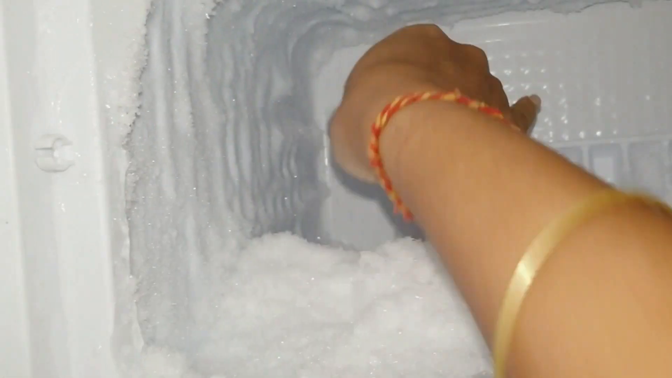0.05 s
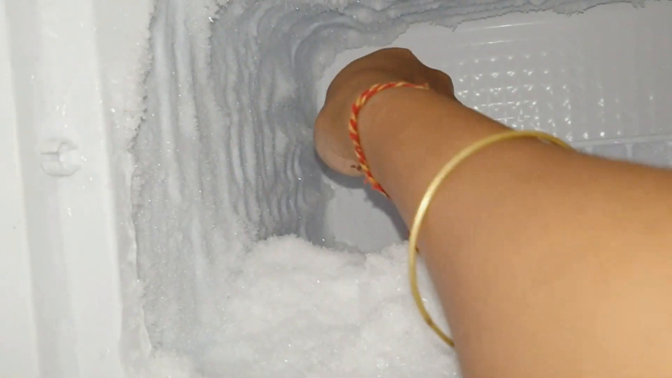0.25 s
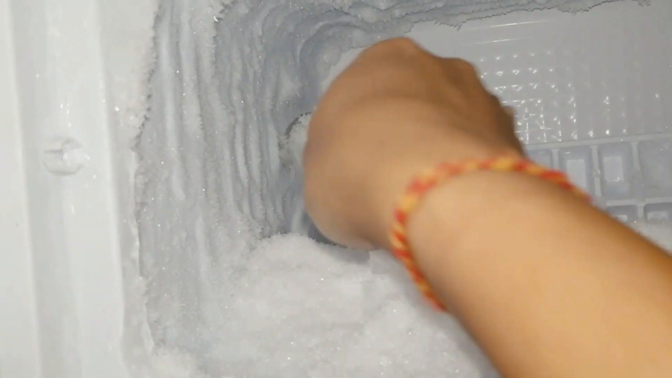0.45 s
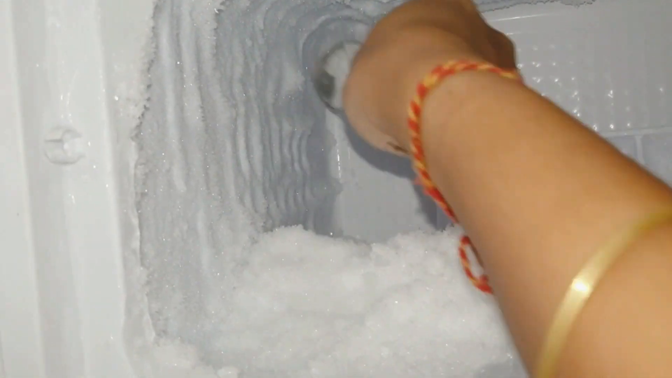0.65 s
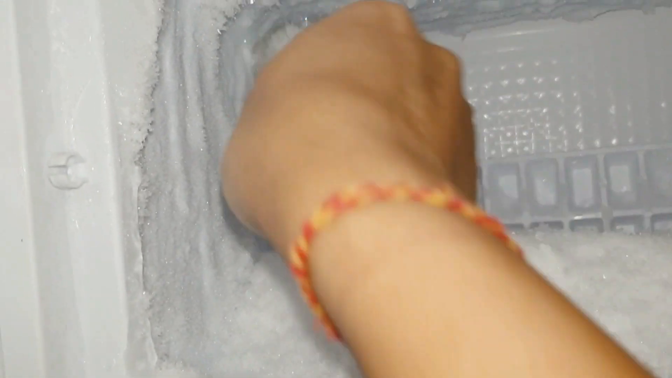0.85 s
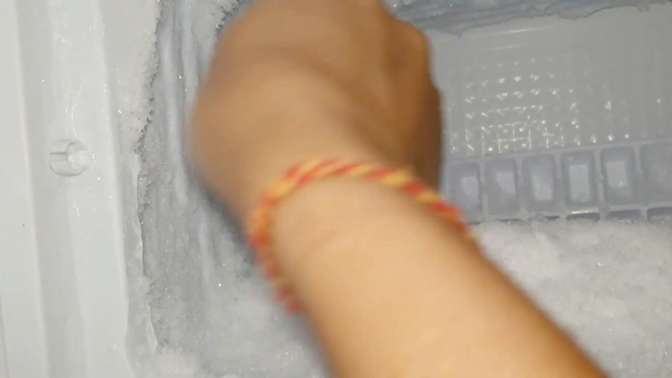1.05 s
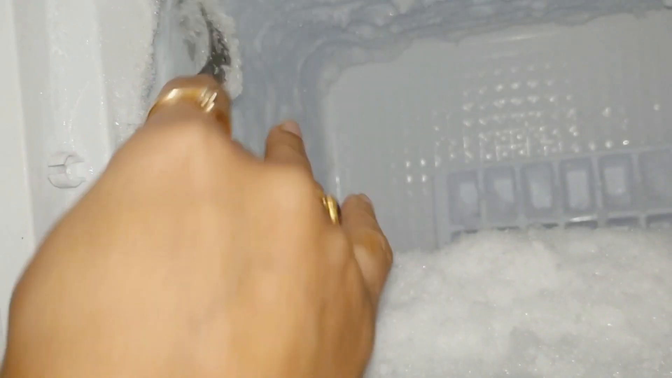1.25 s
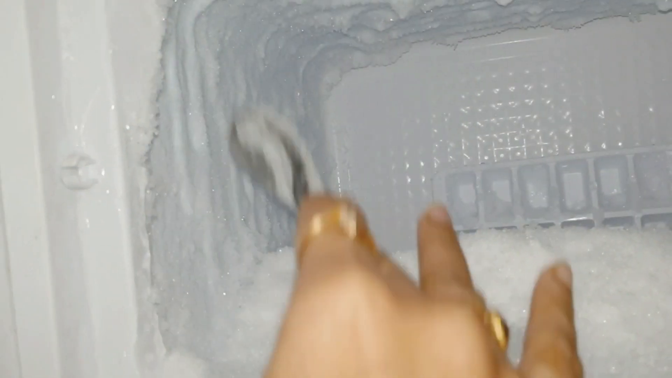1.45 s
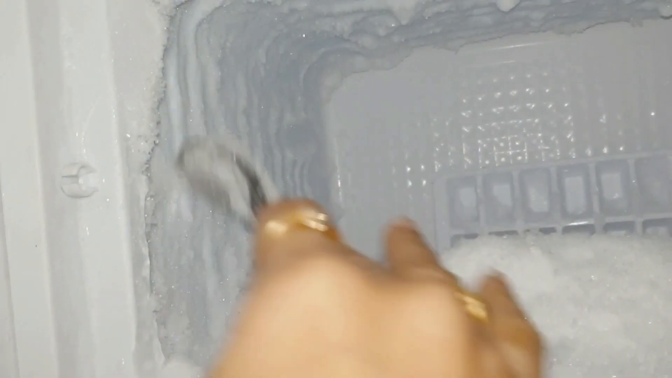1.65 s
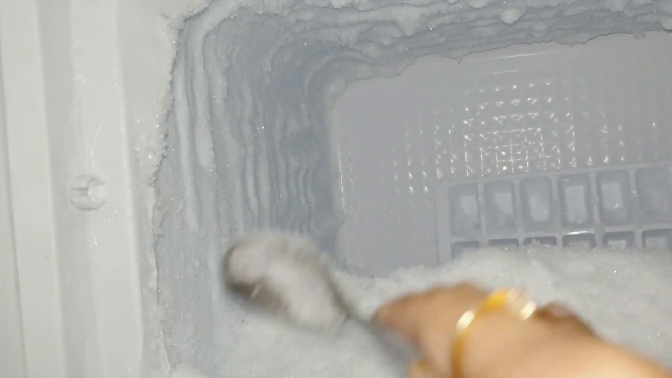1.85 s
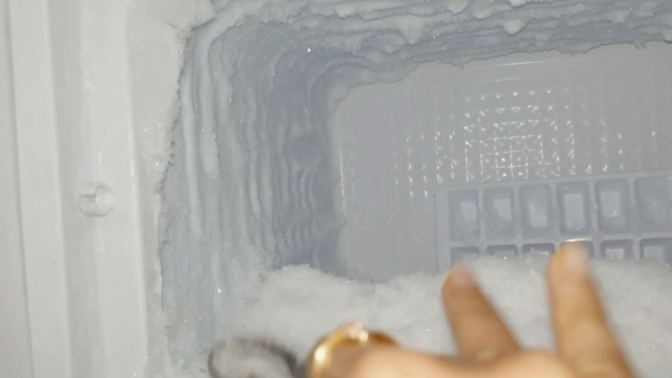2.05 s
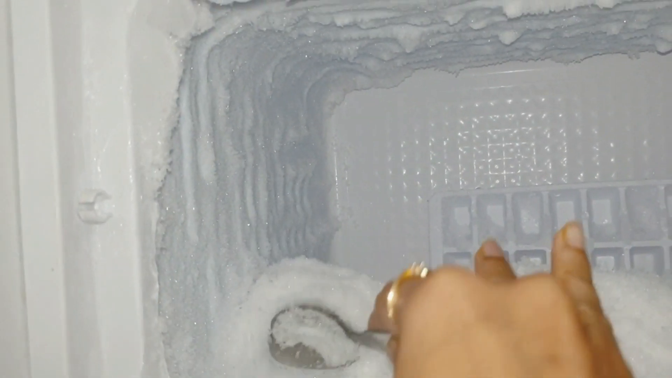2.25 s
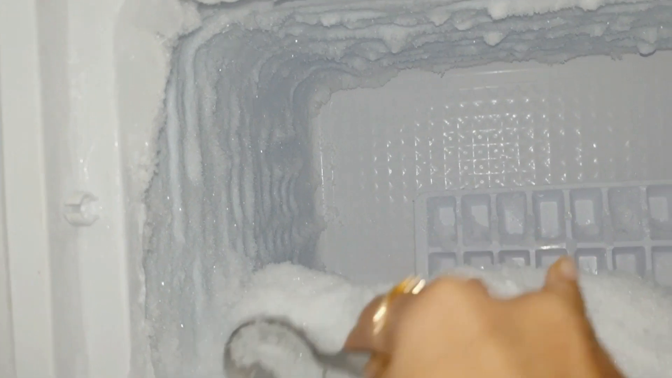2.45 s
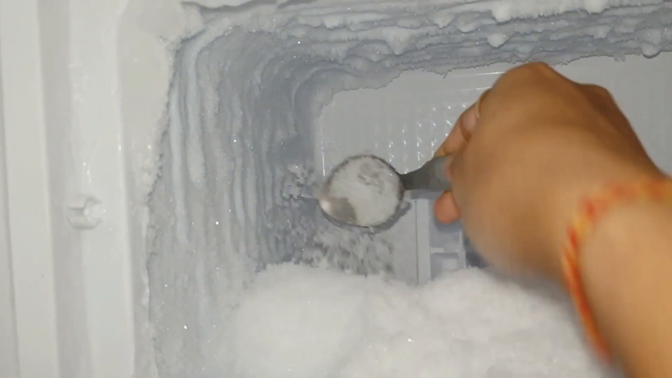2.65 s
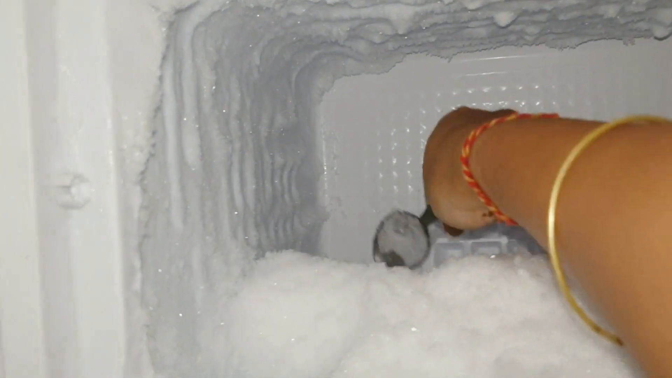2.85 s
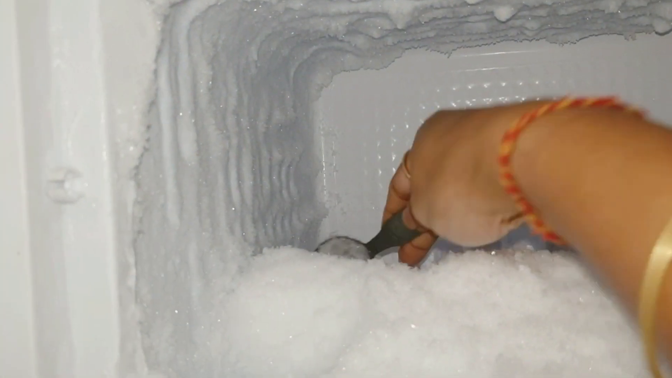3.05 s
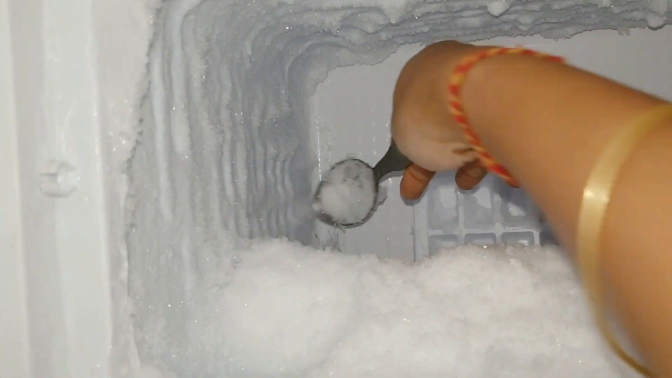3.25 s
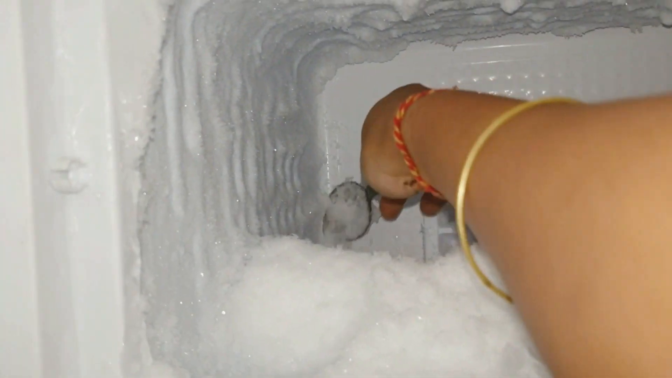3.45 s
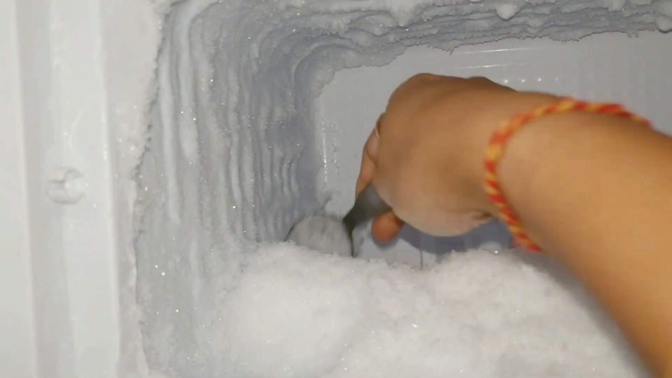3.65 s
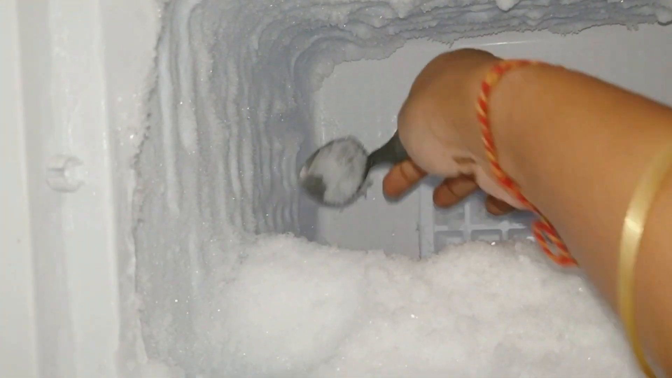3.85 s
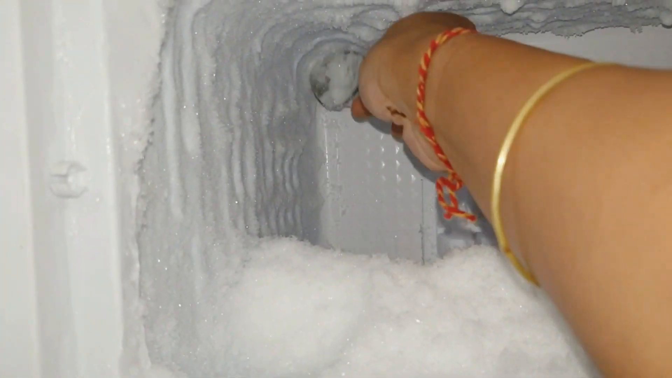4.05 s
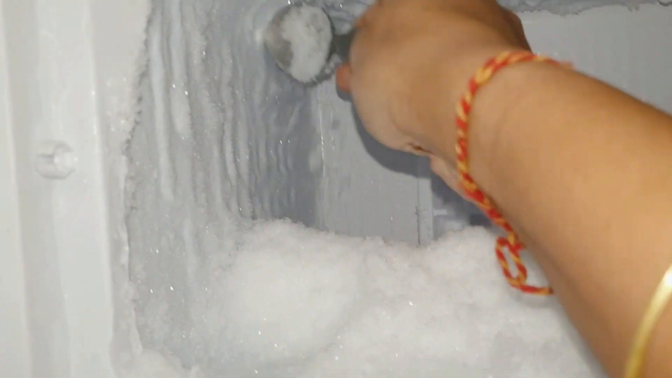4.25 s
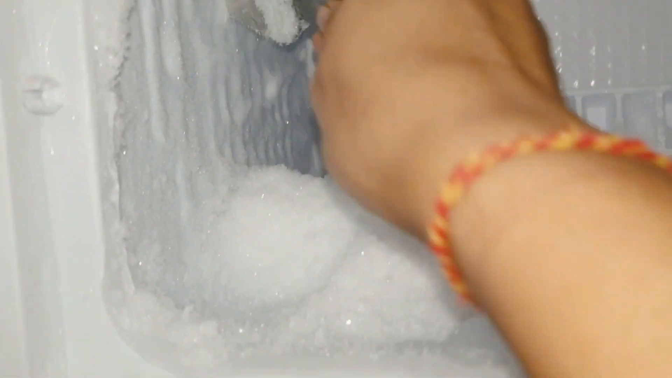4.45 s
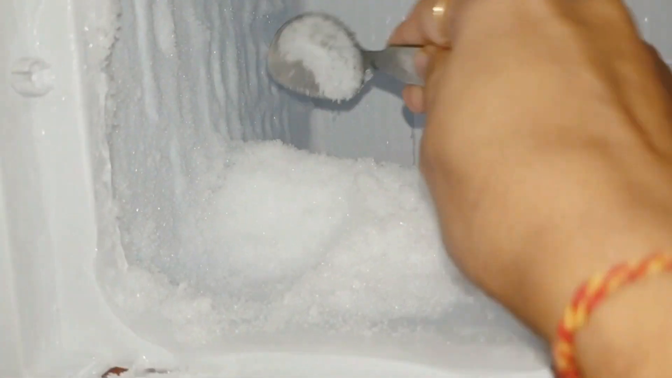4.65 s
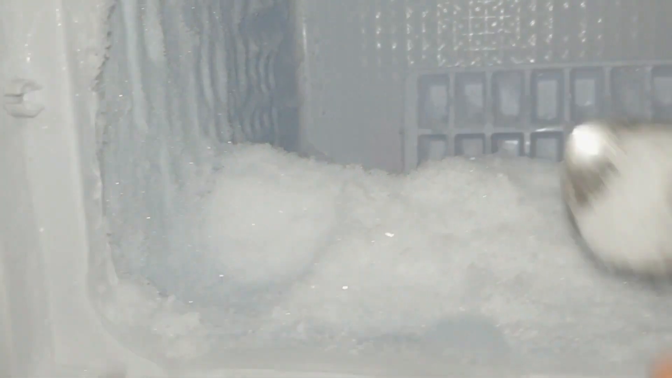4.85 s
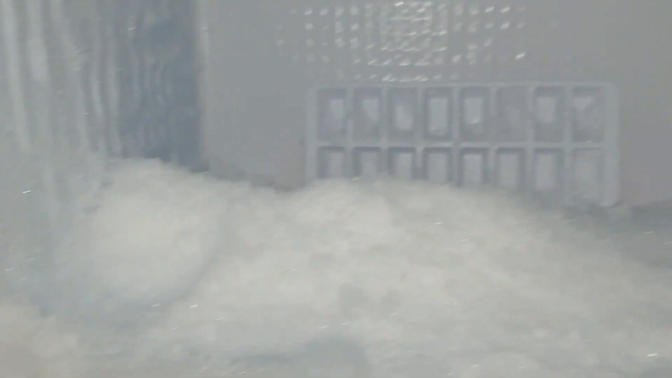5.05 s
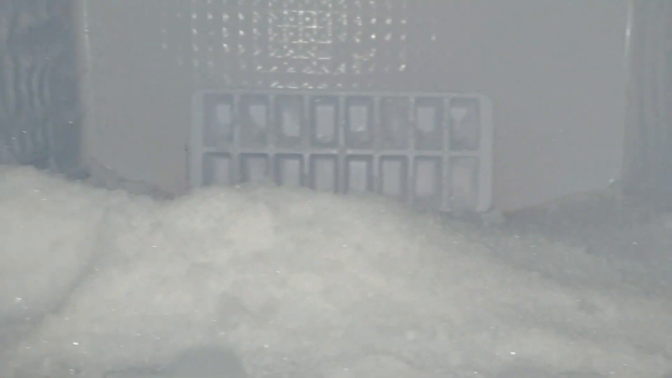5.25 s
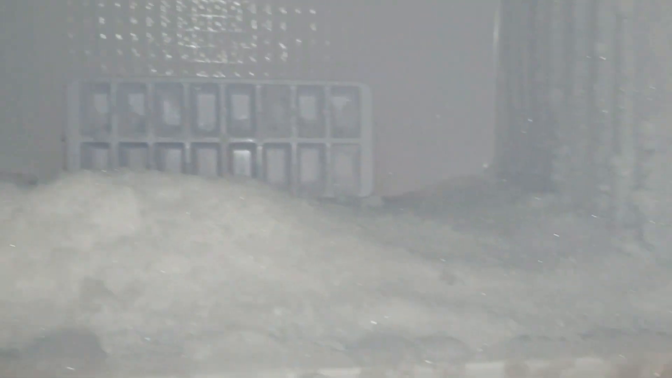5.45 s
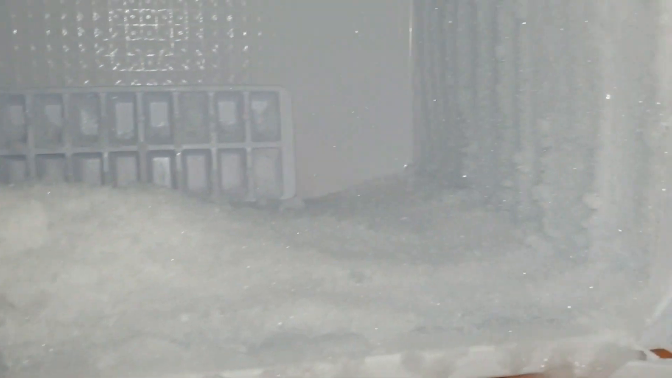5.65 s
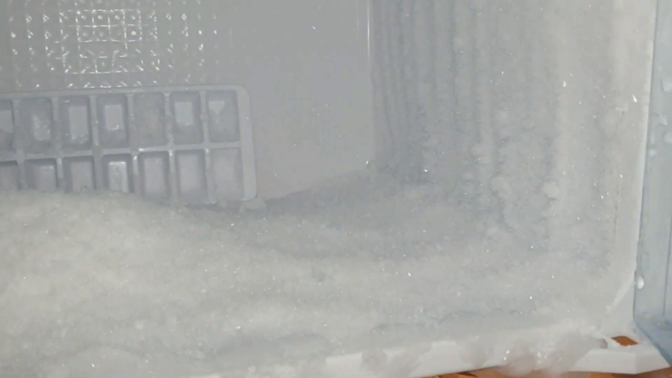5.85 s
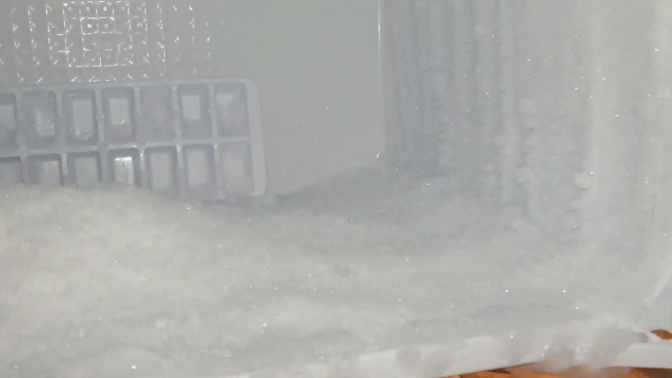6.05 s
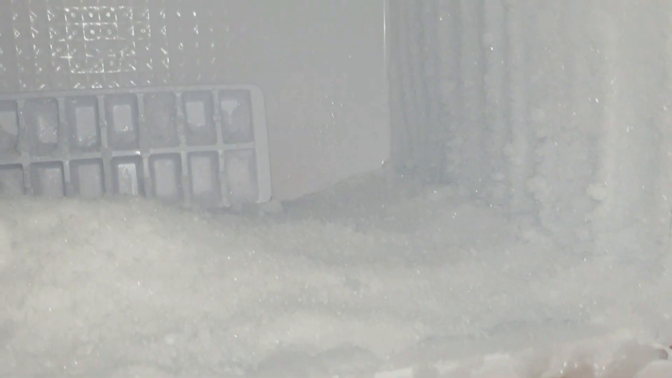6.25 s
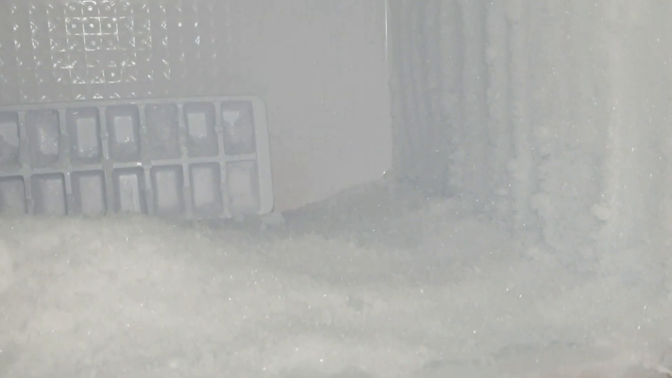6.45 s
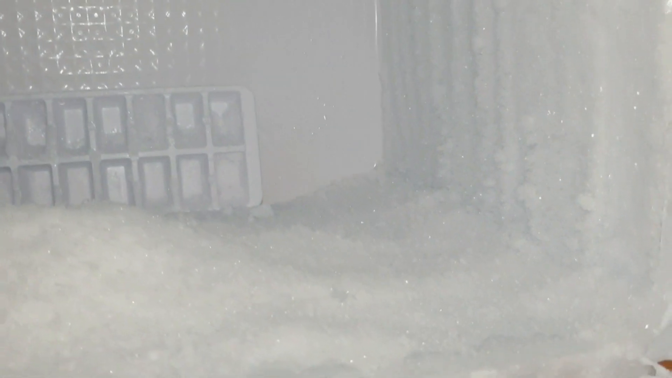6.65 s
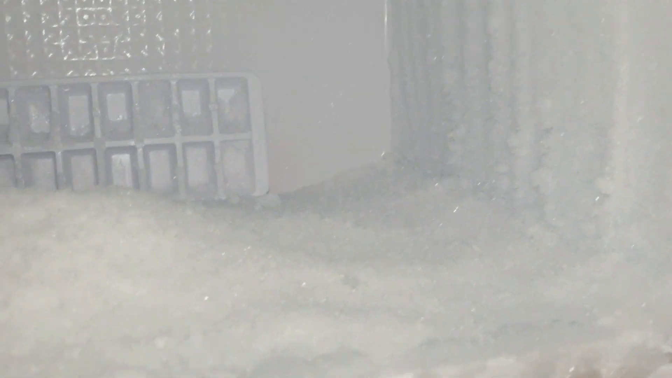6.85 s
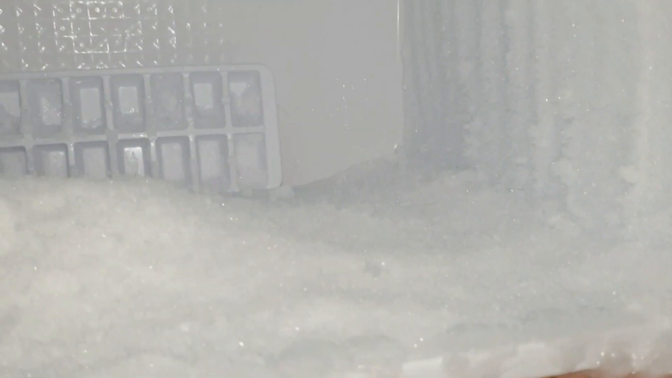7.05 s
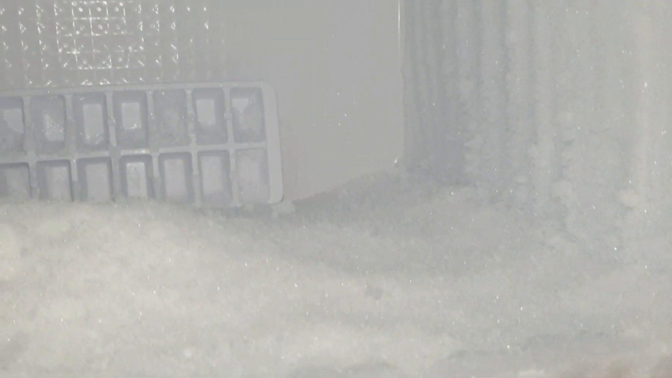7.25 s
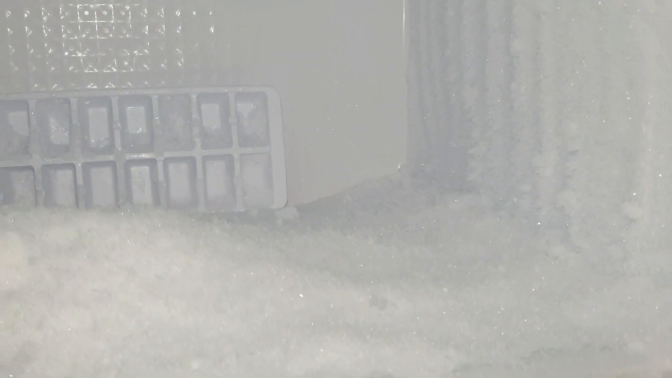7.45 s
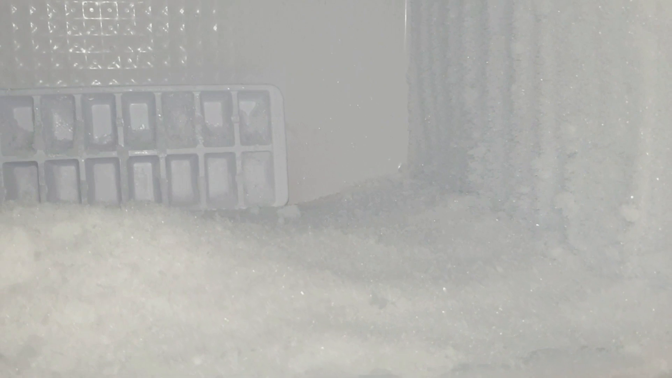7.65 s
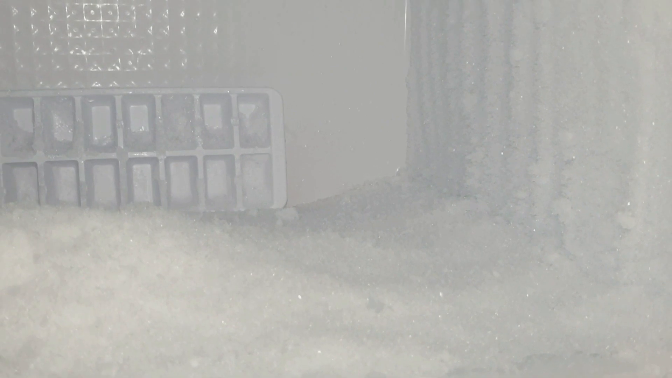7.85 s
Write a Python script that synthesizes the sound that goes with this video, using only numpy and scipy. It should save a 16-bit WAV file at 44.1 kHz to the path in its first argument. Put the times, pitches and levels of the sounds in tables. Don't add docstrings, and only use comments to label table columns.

```python
import sys
import numpy as np
from scipy import signal
from scipy.fft import rfft, irfft
from scipy.io import wavfile

SR = 44100
rng = np.random.default_rng(int(sys.argv[2]) if len(sys.argv) > 2 else 0)


def volts_from_decibels(level):
    exponent = np.asarray(level, float) / 20
    return 10 ** exponent


def waveform_to_disk(signal):
    frames = np.transpose(np.atleast_2d(signal))
    scaled = np.clip(frames, -1, 1) * 32767
    samples = np.round(scaled).astype(np.int16)
    wavfile.write(sys.argv[1], SR, samples)


N = 348831


def rms_one(x):
    return x / np.sqrt(np.mean(x ** 2) + 1e-20)


def noise():
    return rng.standard_normal((2, N))


def in_time(rows):
    s, *columns = np.transpose(rows)
    return [np.interp(np.arange(N) / SR, s, column) for column in columns]


def at_hz(points, hz):
    points = np.array(points)
    return np.interp(np.log(hz), np.log(points[:, 0]), points[:, 1])


def drift(rate_hz):
    r = np.exp(-2 * np.pi * rate_hz / SR)
    white = rng.standard_normal(N + SR)
    return rms_one(signal.lfilter([1], [1, -2 * r, r * r], white)[SR:])


def response(spectrum, peaks):
    hz = np.maximum(np.fft.rfftfreq(8192, 1 / SR), 1)
    level_db = at_hz(spectrum, hz)
    for top_hz, width_hz, gain_db in peaks:
        level_db = level_db + gain_db / (1 + (2 * (hz - top_hz) / width_hz) ** 2)
    cepstrum = irfft(np.log(volts_from_decibels(np.maximum(level_db, -80))))
    cepstrum[1:4096] *= 2
    cepstrum[4097:] = 0
    out = irfft(np.exp(rfft(cepstrum)))[:4096]
    return out / np.sqrt(np.sum(out ** 2))


def coloured(x, spectrum, peaks=()):
    return signal.oaconvolve(x, response(spectrum, peaks)[None], axes=1)[:, :N]


def band(x, low_hz, high_hz):
    sos = signal.butter(3, [low_hz, min(high_hz, .45 * SR)], "band", fs=SR, output="sos")
    return signal.sosfilt(sos, x) * np.sqrt(SR / 2 / (high_hz - low_hz))


def bursts(rows, grains):
    out = np.zeros((2, N))
    for rise, s, fall, peak_db, low_hz, high_hz in rows:
        at = slice(round((s - 2 * rise) * SR), min(round((s + 3 * fall) * SR), N))
        t = np.arange(at.start, at.stop) / SR - s
        bend = 2 if rise == fall else 1.3
        shape = volts_from_decibels(peak_db - 20 * np.where(t < 0, (t / rise) ** 2, np.abs(t / fall) ** bend))
        burst = rms_one(band(grains[:, at] * shape, low_hz, high_hz))
        out[:, at] += burst * np.sqrt(np.mean(shape ** 2))
    return out


def crystals(per_s, spread_db, hiss):
    born = rng.random(N) < per_s * volts_from_decibels(2.2 * drift(40)) / SR
    sizes = born * volts_from_decibels(spread_db * np.minimum(rng.exponential(1, N), 4))
    breaks = rms_one(sizes * rng.choice([-1, 1], (2, N)))
    return rms_one(breaks + hiss * noise())


# start_s, dig_s, pull_s, level_db, pull_loss_db
STROKES = [(0, 0.00069, 0.22, -59, 12.5), (.192, 0.0036, 0.067, -34.5, 1), (0.274, 0.14, .1, -21, 9.5),
           (0.727, 0.068, .11, -30, 3), (1.0, 0.027, 0.029, -48, -3), (1.06, 0.06, .305, -30, 2),
           (1.405, .01, .038, -36.5, 0), (1.621, 0.059, 0.039, -26, -2), (1.994, 0.012, 0.099, -37, 8),
           (2.108, 0.036, .11, -31.5, 3), (2.439, 0.032, 0.047, -34, -1), (2.7, 0.11, 0.11, -58, -10.5),
           (2.94, 0.084, 0.09, -25, 5), (3.498, 0.066, .12, -21.5, 4), (3.873, 0.0092, 0.01, -35, 3.5),
           (3.98, 0.035, 0.17, -29.5, 4), (4.149, 0.037, 0.25, -30, 9), (4.427, 0.0031, 0.13, -27.5, 3),
           (6.8, 0.031, 1.1, -59.5, 8.5), (6.898, 0.0043, 0.033, -34.5, 8.5),
           (7.214, 0.0085, 0.033, -43.5, 4.5), (7.359, 0.036, 0.0045, -28.5, -1)]
# lift_s, bowl_db (re crunch), wall_db (re crunch), panel_db (re wall), fineness_db
GRIP = [(.03, -14, -1.5, -13, -8), (.02, -7.5, -3, -12.5, 1), (0.043, -1.5, -6, -14.5, -2.5),
        (0.06, 0, -5.5, -13.5, -1), (.02, -7.5, 3.5, -5, 0.5), (0.015, 3, -4, 0, 3.5),
        (.015, -4.5, 1, -3, -0.5), (0.039, -4, -3.5, -7.5, -4), (0.021, -8.5, 9.5, 2, -7),
        (.06, 0.5, 7.5, 6, 6.5), (0.034, 4, 10, 5, 5.5), (.04, -2.5, 0.5, -0.5, -5),
        (0.047, -1.5, 0.5, 2.5, 3.5), (0.06, -5, -5.5, -12, -2), (0.019, -8, -6, -8, -2),
        (.04, -5.5, -3.5, -8.5, -3.5), (0.062, -1, -1, -8.5, -2), (0.046, -1.5, -3, -8, -3.5),
        (.1, -3, 7.5, -2, 3.5), (0.064, 3.5, 2, -3.5, 11.5), (0.046, -1, 5, -7, 2.5),
        (0.022, -4.5, -18, -9.5, 1.5)]


def hand():
    entry_db, lift_db, powder_s, powder_db = 13, 21.5, 0.16, 18
    bowl_grows_db, free_share, wall_follows = 4, 0.5, 0.63
    t = np.arange(0, N + 32, 32) / SR
    powers, grip = np.full((3, len(t)), 1e-12), np.zeros((3, len(t)))
    for stroke, hold in zip(STROKES, GRIP):
        s, dig, pull, db, loss_db = stroke
        lift, bowl_db, wall_db, panel_db, fine_db = hold
        times = s + np.cumsum(np.abs([0, dig, pull, lift, powder_s, 2 * powder_s]))
        below = np.cumsum([-entry_db, entry_db, -loss_db, -lift_db, -powder_db, -60])
        shape = np.interp(t, times, below, left=-100)
        bowl = bowl_db + np.interp(t, times[[0, 2, 3]], [-bowl_grows_db, 0, -bowl_grows_db])
        power = volts_from_decibels(2 * (db + shape))
        powers += [power, power * volts_from_decibels(2 * bowl), volts_from_decibels(2 * (db + wall_db + wall_follows * shape))]
        grip += power * np.array([[panel_db], [free_share], [fine_db]])
    rows = (*np.sqrt(powers), *grip / powers[0])
    return [np.interp(np.arange(N) / SR, t, row) for row in rows]


def box(x, t60_s, echo_db, rate_hz):
    fall = volts_from_decibels(-60 * np.arange(2048) / SR / t60_s)
    patterns = rng.standard_normal((3, 2, 2048)) * fall / np.sqrt(np.sum(fall ** 2))
    weights = np.array([drift(rate_hz) for _ in patterns])
    weights /= np.sqrt(np.sum(weights ** 2, axis=0))
    echoes = sum(signal.oaconvolve(x * w, p, axes=1)[:, :N] for w, p in zip(weights, patterns))
    return (x + volts_from_decibels(echo_db) * echoes) / np.sqrt(1 + volts_from_decibels(2 * echo_db))


# pitch_hz, level_db (per Hz)
CRUST = [(530, -19), (900, -4.5), (1070, -1.5), (1340, -2), (1850, -6.5), (3340, -10), (4120, -12),
         (8330, -17), (9000, -26), (11700, -44.5), (19800, -120)]
BOWL = [(7000, -40), (8200, -12), (10000, -5), (12500, -2.5), (15300, -11.5), (16200, -8)]
WALL = [(82, -27), (140, -20.5), (178, -5), (226, -3.5), (291, 4), (567, -1.5), (674, -9.5), (1000, -17.5),
        (1300, -34.5), (2200, -120)]
PANEL = [(100, -34.5), (135, -11), (170, 1.5), (230, -6.5), (280, -5.5), (380, -46)]
# pitch_hz, width_hz, gain_db
CRUST_PEAKS = [(1070, 21, 4), (1820, 320, 2), (3030, 370, 2), (3706, 95, 2.5), (4050, 40, 1),
               (6210, 610, 2), (7600, 150, 4)]
BOWL_PEAKS = [(9290, 560, 6.5), (9960, 110, 3), (11326, 690, 19.5), (12900, 910, 5.5)]
WALL_PEAKS = [(179, 37, 8), (217, 75, 7), (303, 17, 4), (371, 16, 6.5), (460, 14, 5), (563.6, 8.8, 5.5),
              (776, 80, 12.5)]


def scraping(crunch_gain, bowl_gain, wall_gain, panel_db, free, fine_db):
    free = np.clip(free, 0, 1)
    breaks = crystals(3000.0, spread_db=3.0, hiss=0.76)
    chunks = crystals(500.0, spread_db=1.5, hiss=0.64)
    crust, wall, bowl, blows, snaps, ducking = knock_shapes(breaks)
    catch = volts_from_decibels(1.2 * drift(23)) * ducking
    bright = breaks * (catch * bowl_gain + bowl)
    deep = chunks * (catch * wall_gain + wall) + blows

    crunch = coloured(breaks * (catch * crunch_gain + crust), CRUST, CRUST_PEAKS)
    coarse = signal.sosfilt(signal.butter(1, 2600, fs=SR, output="sos"), crunch)
    frost = coarse * volts_from_decibels(-fine_db / 2) + (crunch - coarse) * volts_from_decibels(fine_db / 2)
    ringing = coloured(bright * free, BOWL, BOWL_PEAKS)
    damped = coloured(bright * np.sqrt(1 - free ** 2), BOWL)
    edge = frost + snaps + ringing + damped

    drum = coloured(deep, WALL, WALL_PEAKS) + coloured(deep * volts_from_decibels(panel_db), PANEL)
    near = box(edge, t60_s=.005, echo_db=-5.0, rate_hz=8.9)
    echoed = box(near, t60_s=0.033, echo_db=-1.5, rate_hz=5.4)
    return echoed + drum / np.sqrt(1 + volts_from_decibels(2 * panel_db))


# time_s, hum_db, air_db
CABINET = [(0, -56, -51.5), (.46, -59, -72), (.85, -60, -62), (1.33, -50, -50), (1.9, -50, -56.5),
           (2.05, -43, -44), (2.6, -47.5, -47.5), (2.87, -29, -45), (3.25, -46, -45.5), (3.64, -51, -50),
           (3.9, -57, -61), (4.9, -69, -55), (5.05, -49, -60), (5.75, -58.5, -58), (6.2, -58.5, -51),
           (6.37, -44.5, -49.5), (6.87, -40.5, -44.5), (7.91, -41, -46)]
# peak_s, level_db
SHOVES = [(.48, -29), (.75, -40), (1.09, -39), (1.36, -38), (2.02, -26), (2.16, -29.5), (2.47, -34),
          (3.13, -24.5), (3.64, -35), (4.23, -32), (4.47, -27)]
# pitch_hz, level_db (per Hz)
RUMBLE = [(15, -49.5), (25, -16.5), (118, -8), (177, -12), (405, -16), (570, -26), (618, -19), (1200, -56),
          (1560, -65), (2640, -120)]


def cabinet(wall_gain):
    boom_re_air_db, boom_re_wall_db, air_re_wall_db, cavity_lag_s = 2.5, -14, -13.5, 0.019
    shove_rise_db_per_s, shove_fall_db_per_s = 330.5, 150
    hum_db, air_db = in_time(CABINET)
    r = np.exp(-1 / (cavity_lag_s * SR))
    pumped = signal.lfilter([1 - r], [1, -r], wall_gain)

    starts, peaks_db = np.array(SHOVES)[:, :1], np.array(SHOVES)[:, 1:]
    since = np.arange(0, N + 64, 64) / SR - starts
    slope_db = np.minimum(since * shove_rise_db_per_s, -since * shove_fall_db_per_s)
    shoves = volts_from_decibels(peaks_db + slope_db).sum(axis=0)
    shoved = np.interp(np.arange(N) / 64, np.arange(len(shoves)), shoves)

    phase = 2 * np.pi * np.cumsum(51 + 1.62 * drift(3)) / SR
    tone = np.sqrt(2) * np.sin(phase) * [[1], [0]]
    shake = coloured(noise(), [(25, -47.0), (38, -6.5), (55, 12.5), (70, -2.5), (90, -56.0)])
    boom = coloured(noise(), [(65, -45.5), (85, 2), (140, 2.0), (180, -40.0)],
                    [(107.0, 48, 13.5), (115.5, 16, 8.3)])
    air = coloured(noise(), RUMBLE)
    boom_gain = volts_from_decibels(air_db + boom_re_air_db) + volts_from_decibels(boom_re_wall_db) * pumped + shoved
    air_gain = volts_from_decibels(air_db) + volts_from_decibels(air_re_wall_db) * pumped
    return volts_from_decibels(hum_db) * (0.71 * tone + 0.69 * shake) + boom_gain * boom + air_gain * air


# pitch_hz, level_db (per Hz)
HISS = [(530, -20), (900, -1), (1640, -11.5), (2070, -8.5), (2540, -12), (3550, -19), (5040, -16),
        (7310, -27.5), (11100, -15), (16000, -18.5)]


def room_hiss():
    air_db = in_time(CABINET)[1]
    level_db = -68 + 0.68 * (air_db + 52.5) + 0.51 * drift(4.1)
    return volts_from_decibels(level_db) * coloured(noise(), HISS)


# start_s,
# level_db, thud_db (re level), ring_db (re level), snap_hz
KNOCKS = [(0.192, -16.5, 2, -8, 2110), (0.234, -19, -6, -3, 2920), (0.4319, -10, -7, -21, 1060),
          (0.456, -20.5, -0.5, -7, 1090), (0.7276, -21.5, -13, -11, 1070), (1.0167, -29, -19.5, 1, 1130),
          (1.063, -37, 16, -2, 1850), (1.615, -13, 2.5, -4.5, 794), (1.987, -23, -1.5, 10, 2480),
          (2.0045, -4.5, -0.5, -13, 3050), (2.049, -18, -11, -0.5, 2600), (2.0768, -7, -5, 0.5, 2430),
          (2.1261, -27, 5, 4.5, 1820), (2.4391, -28.5, 17.5, -4, 2070), (2.9474, -24, -4.5, -20, 1900),
          (2.978, -12, -12.5, -21, 2000), (3.238, -42, -21, 9.5, 5000), (3.884, -25.5, -9.5, 2.5, 1570),
          (3.9797, -25.5, 2.5, 0.5, 1640), (4.2248, -9.5, 0, -7.5, 1730), (4.424, -5.5, 0, -14, 1140),
          (2.01, -12, -5, -16, 1230), (3.495, -21, -19.5, -6, 3500), (6.875, -44, -10, -13, 2200),
        (6.8969, -11, 6.5, 7, 3380), (6.9052, -11, -2, 1.5, 4770), (7.0438, -32, -9, 7, 6700),
        (7.0577, -33, -10, 12.5, 6750), (7.1249, -47, -5, 7, 2200), (7.171, -42.5, -4.5, 6, 6500),
        (7.2164, -43, 7, -10, 4530), (7.3472, -18, -8.5, -17, 1820), (7.385, -11.5, -14, 2, 1870),
        (7.3999, -20, -21, -12, 1820)]


def knock_shapes(breaks):
    knock_t60_s, longer_per_thud, shorter_per_peak = 0.041, 0.36, 0.37
    crust, wall, bowl, blows = np.zeros((4, N))
    ducking, snaps = np.ones(N), np.zeros((2, N))
    t = np.arange(SR // 4) / SR
    crack = 1 + 0.64 * np.exp(-t / 0.0032)
    fade_in = np.minimum(t / 0.0027, 1)
    for s, peak_db, thud_db, ring_db, snap_hz in KNOCKS:
        t60_s = knock_t60_s * volts_from_decibels(longer_per_thud * thud_db - shorter_per_peak * (peak_db + 22.0))
        at = slice(round(s * SR), round(s * SR) + SR // 4)
        fall = volts_from_decibels(peak_db - 10.0 - 60 * t / max(t60_s, .005)) * fade_in
        crust[at] += fall * volts_from_decibels(-5.0) * crack
        wall[at] += fall ** 0.89 * volts_from_decibels(thud_db + 0.037 * peak_db)
        bowl[at] += fall * volts_from_decibels(ring_db) * crack
        blows[at.start + 30] = volts_from_decibels(peak_db + thud_db + 1.0)
        burst = rms_one(fall * breaks[:, at]) * np.sqrt(np.mean(fall ** 2))
        snaps[:, at] += volts_from_decibels(3.0) * band(burst, snap_hz * .72, snap_hz * 1.236)
        ducking[at.start - 500:at.start] = volts_from_decibels(-8.0 * np.hanning(1000)[:500])
    return crust, wall, bowl, blows * [[1], [.4]], snaps, ducking


# middle_s, half_length_s, level_db, pitch_hz
SLABS = [(0.203, .02, -38, 2840), (.5, .04, -33, 1100), (0.343, 0.034, -33, 4200), (0.36, 0.044, -30, 2800),
         (0.415, 0.037, -26.5, 1100), (0.466, 0.039, -29.5, 754), (0.807, 0.056, -36.5, 4120),
         (0.807, 0.076, -35.5, 1060), (0.813, 0.092, -38.5, 1850), (1.13, 0.08, -44, 1850),
         (1.385, 0.095, -33, 800), (1.42, 0.04, -35, 1600), (1.688, 0.082, -34, 759),
         (1.694, 0.034, -33.5, 1890), (1.725, 0.0091, -36, 4530), (2.915, 0.018, -37.5, 2110),
         (2.911, 0.022, -44, 3600), (2.995, 0.025, -30.5, 3000), (3.008, 0.035, -35, 965),
         (3.018, 0.044, -28, 1760), (3.06, 0.028, -31.5, 2600), (3.087, 0.011, -35.5, 1900),
         (3.567, 0.036, -27, 894), (3.599, .02, -31.5, 4100), (3.632, 0.036, -23, 1656),
         (3.664, 0.042, -30.5, 3800), (3.668, 0.049, -31.5, 9170), (4.021, 0.047, -36.5, 943),
         (4.056, 0.025, -27, 2380), (4.161, .008, -40, 3800), (4.178, 0.013, -31, 2000),
         (4.227, 0.015, -26, 996), (4.308, .08, -38.5, 1830), (4.506, 0.056, -32.5, 1390),
         (4.53, 0.049, -37, 3840), (4.555, 0.032, -33, 784), (0.333, 0.033, -34, 6200),
         (0.845, .025, -35, 3800), (1.686, .04, -28, 12900), (1.713, .03, -30, 1500),
         (3.083, .03, -36, 6300), (4.157, 0.057, -41, 3720), (4.14, .05, -36.5, 2040),
         (7.225, .02, -48, 4850), (7.393, 0.016, -39, 5900)]
# start_s, decay_s, level_db, low_hz, high_hz
SNAPS = [(0.433, 0.0083, -20, 800, 1406), (0.4589, 0.013, -22.5, 600, 1290),
         (1.607, 0.043, -42.5, 1000, 15300), (1.728, 0.0065, -26, 2500, 5500),
         (2.007, .01, -17, 2600, 3600), (2.0075, 0.0048, -27, 5000, 15000), (2.0065, .018, -21, 1000, 1900),
         (2.0775, 0.01, -23, 3200, 4530), (2.0778, 0.01, -25.5, 8000, 16000),
         (2.224, 0.0099, -24.5, 9500, 14000), (2.948, 0.0076, -24, 1500, 5800),
         (3.077, .008, -25, 600, 2800), (3.688, .01, -25.5, 3500, 4950), (4.2265, 0.02, -19, 500, 2200),
         (4.4255, .022, -18.5, 1500, 2700), (4.426, 0.022, -13, 700, 1400),
         (6.897, .025, -26.5, 1000, 8900), (6.905, .015, -26, 2000, 8900), (1.616, 0.014, -25.5, 600, 1950),
         (2.978, 0.014, -24.5, 1500, 3200), (3.885, 0.013, -34, 600, 2460),
         (4.561, 0.011, -27.5, 3000, 14100)]


def slabs():
    rings = [(half, s, half, db, hz * 0.933, hz * 1.07) for s, half, db, hz in SLABS]
    fractures = [(.001, *row) for row in SNAPS]
    return bursts(rings + fractures, crystals(5000.0, spread_db=2.5, hiss=1.4))


# peak_s, level_db, pitch_hz
SWINGS = [(.33, -37.5, 296), (.44, -28.5, 290), (.45, -32, 559), (.46, -35, 198.7), (0.501, -30, 107),
          (1.21, -36, 208), (1.71, -35.5, 380), (1.741, -35, 190), (2.01, -31.5, 160), (2.04, -30, 117),
          (2.15, -25.5, 174), (2.16, -21.5, 107), (2.17, -32.5, 458), (2.19, -34, 339), (2.46, -27, 114.3),
          (2.47, -27, 204.7), (2.47, -33.5, 330), (2.53, -26.5, 209), (2.81, -33.5, 124),
          (3.071, -28.5, 184), (3.08, -33.5, 459), (3.65, -33.5, 368), (3.66, -31.5, 310), (3.69, -34, 560),
          (4.3, -32.5, 388), (4.44, -32.5, 183), (4.44, -32.5, 559), (4.45, -34.5, 301),
          (4.481, -30.5, 107), (6.906, -37, 464), (7.37, -34.5, 117)]


def swings():
    rise_s, fall_s = 0.026, 0.041
    out = np.zeros((2, N))
    for s, peak_db, hz in SWINGS:
        at = slice(round((s - 3 * rise_s) * SR), round((s + 3 * fall_s) * SR))
        t = np.arange(at.start, at.stop) / SR - s
        swell = np.exp(-(t / np.where(t < 0, rise_s, fall_s)) ** 2)
        out[0, at] += volts_from_decibels(peak_db + 3.0) * swell * np.sin(2 * np.pi * hz * t)
    return out


# start_s, decay_s, level_db, low_hz, high_hz
TICKS = [(5.9, .008, -59, 2500, 5000), (5.335, .012, -52.5, 2700, 4400), (5.335, .006, -66, 9800, 12500),
         (5.345, .05, -67, 2200, 4500), (5.55, .01, -63, 830, 1700), (5.822, .014, -48.5, 3400, 6500),
         (5.83, .1, -65, 3400, 5400), (5.826, .008, -55, 11000, 13500), (5.058, 0.0074, -64, 11000, 15500),
         (5.21, 0.019, -70, 11000, 13000), (6.122, 0.0098, -50, 9000, 11800),
         (6.122, .006, -62, 3000, 18000), (6.287, .01, -60, 5000, 14500), (6.68, .03, -64, 3500, 14000),
         (1.562, .02, -58, 7000, 14000)]
# middle_s, half_length_s, level_db, low_hz, high_hz
TRICKLES = [(4.2, 0.15, -62, 1100, 2500), (4.85, 0.15, -68, 1400, 1960), (4.88, 0.19, -69, 4340, 5200),
            (4.84, 0.25, -61, 9600, 16000), (6.13, 0.11, -70, 9500, 12200), (5.62, .22, -74.5, 9300, 14000),
            (6.39, 0.072, -70.5, 6100, 6800), (6.83, 0.055, -68, 4000, 15000),
            (6.36, 0.14, -64, 8900, 15500), (6.82, 0.086, -66, 3150, 3470), (6.68, .15, -63, 1300, 3000),
            (8.1, 0.12, -67, 700, 2300), (7.59, 0.092, -66.5, 4800, 5300), (1.88, 0.19, -57.5, 1000, 6800),
            (1.91, 0.19, -56, 8500, 15300)]


def settling():
    cracks = [(.001, *row) for row in TICKS]
    falls = [(row[1], *row) for row in TRICKLES]
    return bursts(cracks + falls, crystals(4200.0, spread_db=3.5, hiss=0.86))


# start_s, pressure_jump (full scale = 1)
SLIPS = [(3.3845, .5), (3.3855, 1.0), (3.3872, -3.2), (3.3893, 3.5), (3.404, .25), (3.4055, .25),
         (3.489, .3), (3.493, -.7), (3.495, -.6), (3.4966, 3.0), (3.4992, -2.2), (3.5005, .6),
         (3.5016, -2.2), (3.505, 3.8)]


def finger():
    port_hz, port_t60_s, port_cut_hz = 48, .085, 1200
    jumps = np.zeros(N)
    for s, jump in SLIPS:
        jumps[round(s * SR)] = jump
    r, w = volts_from_decibels(-60 / port_t60_s / SR), 2 * np.pi * port_hz / SR
    rung = signal.lfilter([1, -r * np.cos(w)], [1, -2 * r * np.cos(w), r * r], jumps + 1e-18)
    rubbing = 1 + .3 * drift(600)
    return signal.sosfilt(signal.butter(2, port_cut_hz, fs=SR, output="sos"), rung * rubbing)


# start_s, decay_s, level_db, low_hz, high_hz
RUBS = [
    (3.385, 0.017, -23, 900, 3420),
    (3.39, 0.022, -41, 2500, 7980),
    (3.419, 0.0031, -47, 500, 3000),
    (3.4335, .035, -28, 500, 3500),
    (3.477, 0.005, -38, 500, 2500),
    (3.483, .03, -37, 600, 3800),
    (3.496, 0.013, -25.5, 800, 8000),
    (3.511, .015, -23, 1500, 8000),
    (3.419, 0.21, -18, 25, 70.9),
    (3.471, 0.039, -22, 59.9, 301),
]


def rubs():
    return bursts([(.001, *row) for row in RUBS], noise())[0]


# pitch_hz, level_db
HORN = [(2099, -76), (2159, -67), (2519, -63), (2869, -65), (3052, -82), (3235, -65)]


def horn():
    middle_s, width_s = 6.655, 0.099
    t = np.arange(N) / SR
    swell = np.exp(-((t - middle_s) / width_s) ** 4) * [[1], [.5]]
    waver = np.cumsum(1 + .001 * drift(40)) / SR
    return swell * sum(volts_from_decibels(db + 2.5 * drift(20)) * np.sin(2 * np.pi * hz * waver) for hz, db in HORN)


# pitch_hz, coherence (0 to 1)
LIKENESS = [(60, 0.63), (130, 1), (290, 0.91), (640, 0.7), (1400, 0.72), (4000, 0.074), (15000, 0.2)]
# pitch_hz, left_minus_right_db
TILT = [(60, -3), (110, -4), (200, -4.5), (380, 0), (700, -5.5), (1290, -2), (2380, -2.5), (4400, -6),
        (8120, -9.5), (15000, -3.5)]
# pitch_hz, lag_share (1 = full lag)
LAG_SHARE = [(900, .35), (1800, 1.1), (3000, 1.003)]


def at_ports(pair, lag):
    hz = np.maximum(np.fft.rfftfreq(N + 257, 1 / SR), 1)
    shared, own = rfft(pair, N + 257)
    alike, tilt_db = np.clip(at_hz(LIKENESS, hz), 0, 1), at_hz(TILT, hz)
    shared, own = shared * np.sqrt((1 + alike) / 2), own * np.sqrt((1 - alike) / 2)
    delay = np.exp(-2j * np.pi * hz * lag * at_hz(LAG_SHARE, hz) / SR)
    left = (shared + own) * volts_from_decibels(tilt_db / 2) * delay
    right = (shared - own) * volts_from_decibels(-tilt_db / 2)
    return irfft([left, right], N + 257)[:, :N]


def scene():
    strokes = hand()
    spoon = scraping(*strokes) + slabs() + swings()
    around = cabinet(strokes[2]) + room_hiss() + settling() + horn()
    pressed = np.clip(finger(), -.93, .93) + rubs()
    return at_ports(spoon, lag=20) + at_ports(around, lag=0) + pressed * [[0], [1]]


def roll_off(x):
    return signal.sosfilt(signal.butter(12, 17000, fs=SR, output="sos"), x)


def record(dry):
    clipped = np.clip(dry, -.98, .98)
    cut = signal.sosfilt(signal.cheby2(12, 45, 16100, fs=SR, output="sos"), clipped)
    return roll_off(cut)


dry = scene()
out = record(dry)
waveform_to_disk(out)
```